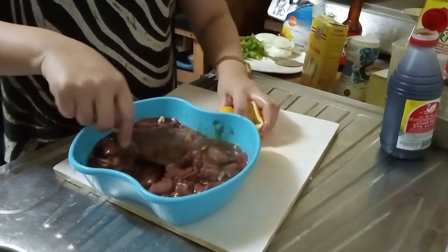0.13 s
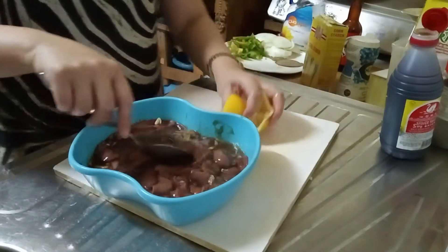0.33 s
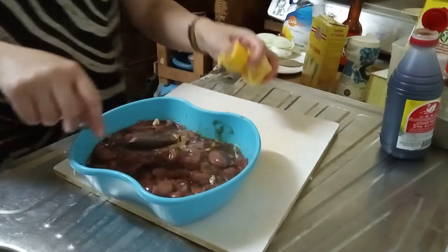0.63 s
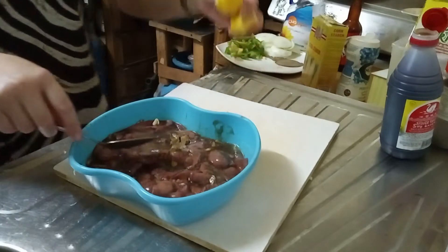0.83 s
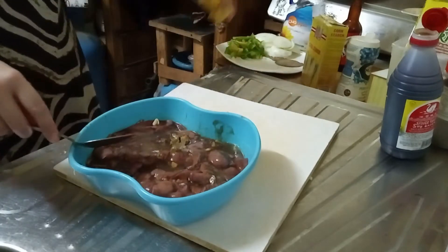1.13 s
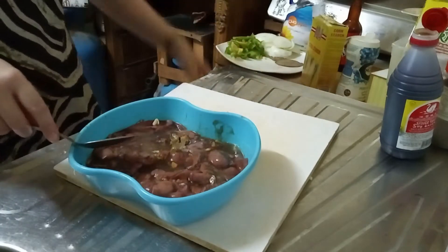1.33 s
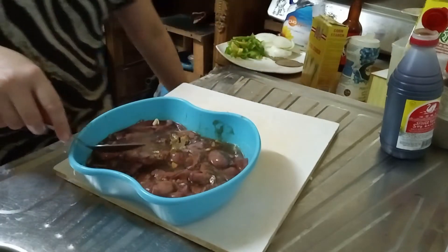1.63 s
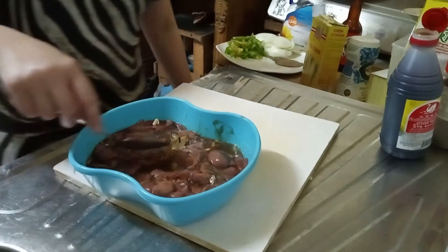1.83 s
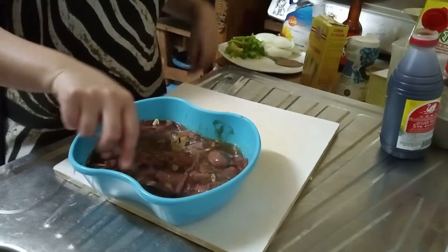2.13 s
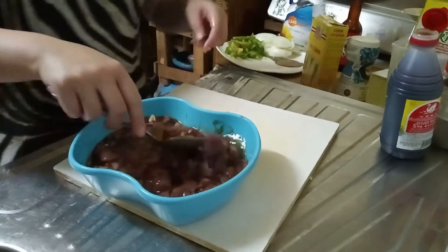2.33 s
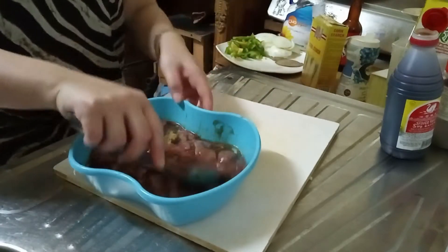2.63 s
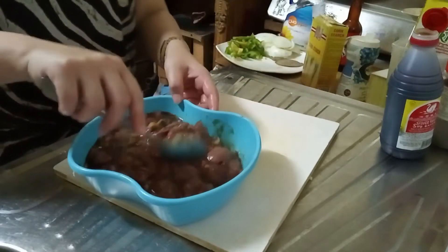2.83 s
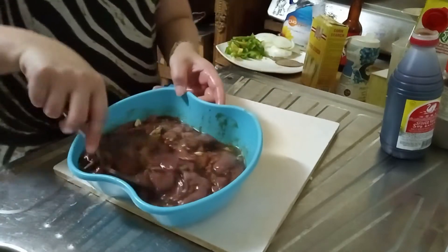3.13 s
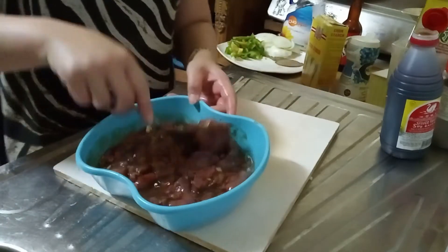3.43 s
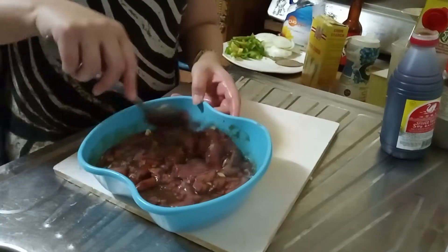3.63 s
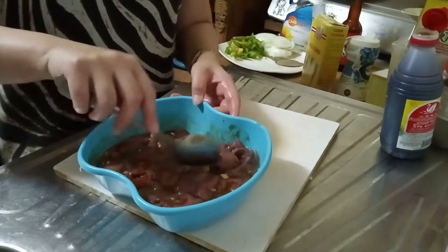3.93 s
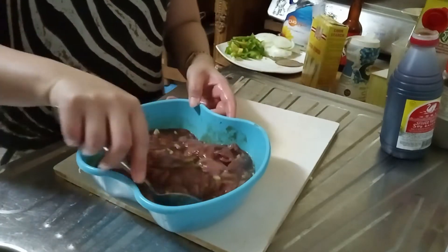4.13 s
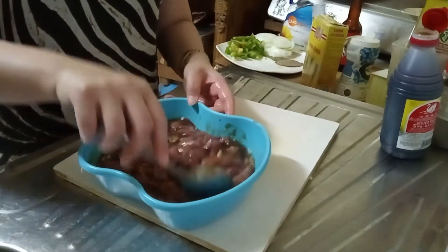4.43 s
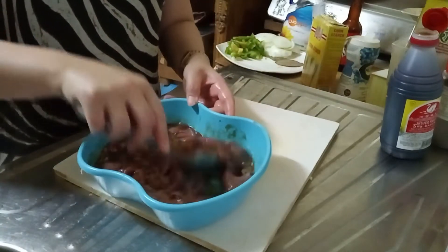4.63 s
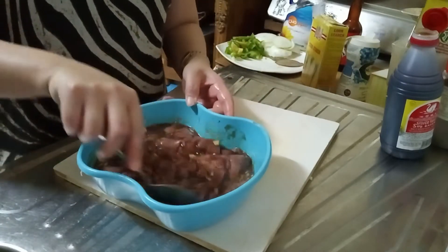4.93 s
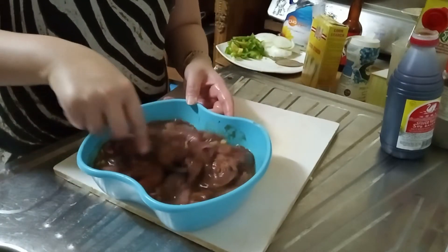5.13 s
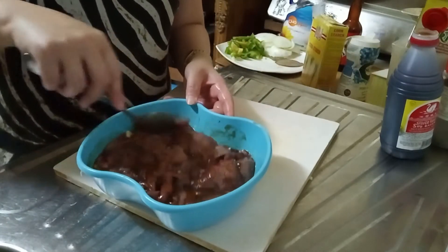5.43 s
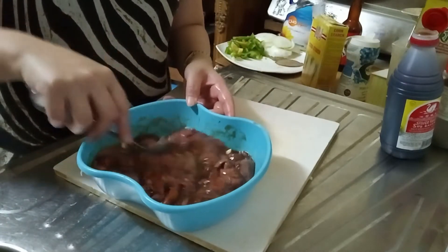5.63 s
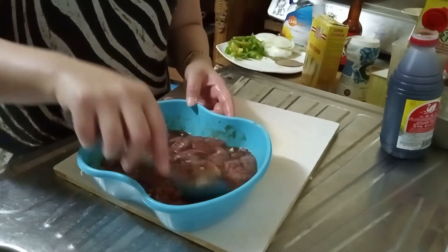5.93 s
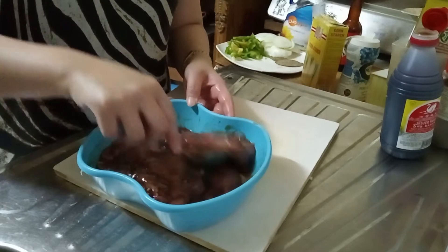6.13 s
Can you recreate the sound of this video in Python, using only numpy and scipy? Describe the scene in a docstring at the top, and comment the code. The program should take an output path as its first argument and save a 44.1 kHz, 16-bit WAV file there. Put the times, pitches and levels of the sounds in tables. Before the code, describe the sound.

A metal spoon stirs raw meat in marinade, ticking and scraping irregularly against a plastic bowl. The bowl rings briefly and thumps on a cutting board. About two seconds in, one longer stroke swishes through the meat. Faint squelches and tiny bubble pops fill the gaps, and the loudest knocks come near the end. It sounds close, in a small kitchen with a short echo and a low hum.

```python
"""Over a low hum, a metal spoon scrapes and ticks on a plastic bowl, stirring raw meat in marinade.
Each touch makes the bowl ring, and the heavy bowl thumps on its cutting board. About two seconds in,
one long stroke swishes through the meat. Between strokes the marinade squelches faintly and tiny
bubbles pop. The close walls of a small kitchen add a short echo."""
import sys
import numpy as np
from scipy import signal
from scipy.io import wavfile

SR = 44100
rng = np.random.default_rng(int(sys.argv[2]) if len(sys.argv) > 2 else 0)


def bounce(signal):
    """Save signal as a 16-bit WAV file at the path given by the first command-line argument."""
    frames = np.transpose(np.atleast_2d(signal))
    limited = np.clip(frames, -1, 1)
    pcm = np.round(limited * 32767).astype(np.int16)
    wavfile.write(sys.argv[1], SR, pcm)


N = 277256

# Levels in the tables are relative: the functions add their own gains. fade_s is the time to fall 60 dB.
# Tone of the room's background noise: freq_hz, level_db
HUM_TONE = [(20, -29.5), (45, -24.5), (70, -6), (100, 5.5), (125, 7.5), (160, -1), (220, -9), (300, -20.5),
            (600, -21.5), (1000, -36.5), (2500, -42), (6000, -49), (8500, -58), (15500, -56)]
# How the low drone rises and falls: time_s, level_db
DRONE_LEVELS = [(0, -61.5), (.5, -63), (.78, -69.5), (.95, -62.5), (1.5, -68.5), (1.78, -66.5), (1.95, -60),
                (2.45, -65.5), (2.65, -60), (2.95, -63.5), (3.8, -63.5), (4.1, -67.5), (4.5, -63),
                (4.85, -62), (5.08, -74), (5.38, -65.5), (6.1, -61), (6.28, -68.5)]
# Slow pushes of the spoon squeeze the meat: start_s, rise_s, hold_s, slosh_db, fizz_db
SQUEEZES = [(0.615, 0.048, .01, -68, -83), (0.853, 0.07, .04, -68.5, -80), (1.032, 0.075, .06, -74.5, -88),
            (1.432, .008, .01, -68.5, -79), (1.546, 0.047, .1, -79, -84.5), (1.656, 0.23, .08, -73, -70.5),
            (2.471, 0.12, .09, -66.5, -80), (2.738, 0.014, .04, -63, -70), (2.83, 0.044, .18, -80, -95),
            (3.446, 0.11, .01, -73, -80), (3.628, .003, .1, -76.5, -71), (3.771, 0.14, .03, -67, -75),
            (4.15, 0.019, .03, -84, -81.5), (4.223, 0.062, .02, -69, -76.5), (4.4, 0.025, .05, -85, -98.5),
            (5.184, 0.026, .03, -87, -84.5), (5.318, 0.038, 0.026, -63, -69.5),
            (5.539, 0.0031, .004, -77, -66), (5.58, .02, .07, -78, -92), (6.004, 0.045, .1, -80.5, -97.5),
            (6.135, .03, .04, -72, -87)]
# Tone of the low, wet part of a squelch: freq_hz, level_db
SLOSH_TONE = [(150, -1), (400, 4), (700, 0), (1100, -5.5), (1900, -9.5), (3000, -20), (6000, -32.5),
              (12000, -58)]
# Tone of the bright part of a squelch: freq_hz, level_db
FIZZ_TONE = [(800, -18.5), (2000, 7.5), (3000, 2), (4500, 3), (6300, 1), (8000, -21.5), (10000, -18),
             (14000, -34.5)]
# Notes the thin steel spoon sings as it slides: pitch_hz, level_db, fade_s
SPOON_NOTES = [(1907, 3.5, 0.16), (3170, -1, .1), (3780, 2.5, 0.2)]
# Short pings (bubbles, wet smacks and three light clinks of the spoon):
# start_s, level_db, pitch_hz, fade_s
PINGS = [(0.085, -27.5, 494, 0.08), (0.115, -54.5, 6700, .008), (0.319, -47.5, 2910, 0.014),
         (0.3194, -47, 1900, .035), (2.271, -66, 9900, .008), (2.318, -64.5, 9900, .009),
         (2.4434, -48.5, 2280, 0.012), (2.4883, -59.5, 3200, 0.021), (2.5122, -51, 2424, 0.0075),
         (2.513, -66, 7200, 0.0046), (2.519, -71, 9900, .005), (2.5646, -48.5, 1200, 0.023),
         (2.7517, -49, 1530, 0.0065), (2.752, -51.5, 5700, .006), (2.9118, -51, 4000, 0.0019),
         (3.185, -62.5, 9200, 0.0076), (3.552, -65, 9600, 0.0065), (3.63, -59.5, 6640, 0.0045),
         (4.2936, -51.5, 2460, 0.018), (4.578, -73, 10600, .03), (4.698, -64, 9950, .003),
         (5.203, -62.5, 1960, 0.054), (5.314, -60.5, 1040, 0.056), (5.3375, -46.5, 1745, .055),
         (5.549, -61.5, 8960, 0.0036), (5.549, -49, 1490, 0.019)]
# Scrapes on the bowl wall and, at 0.41 s, a faint, bright fizz of the marinade:
# start_s, rise_s, hold_s, level_db, pitch_hz, width_octaves
SCRAPES_AND_FIZZ = [(0.014, 0.089, 0.033, -55, 3460, 1.35), (.081, 0.0086, .01, -36.5, 520, 0.41),
                    (0.087, .002, 0.037, -41, 1490, 0.6), (0.123, 0.017, 0.027, -41.5, 1830, 1.37),
                    (0.41, 0.023, 0.035, -66, 4020, 0.78), (1.177, .002, .02, -48, 560, 0.76),
                    (1.18, .004, 0.021, -51.5, 1640, .74), (1.432, 0.0018, 0.012, -59, 580, 0.44),
                    (1.872, .006, 0.022, -56.5, 2000, 3.6), (2.074, 0.0082, 0.05, -46, 655, 0.95),
                    (2.199, 0.0029, 0.11, -49, 417, .94), (2.259, .003, 0.058, -40, 1200, 1.53),
                    (2.563, 0.0033, .026, -63, 1220, 0.45), (3.144, .001, 0.0065, -50, 4260, 1.2),
                    (3.15, 0.0015, 0.0057, -49.5, 527, 0.25), (3.167, 0.0055, 0.015, -49, 3200, 1.03),
                    (4.244, 0.0044, 0.013, -64, 2460, 0.57), (4.574, .003, .013, -45, 1100, 3.9),
                    (4.662, 0.0033, 0.03, -38.5, 1030, 1.2), (5.366, .004, 0.013, -53.5, 554, 0.52),
                    (5.675, 0.02, 0.0035, -60, 2230, 1.2), (5.696, 0.004, 0.0072, -32.5, 1480, .7),
                    (5.702, 0.0053, 0.031, -27.5, 940, 0.97), (5.703, 0.0091, 0.046, -40, 3150, 0.84),
                    (5.736, 0.012, 0.013, -33, 950, 0.8)]
# Tone of a spoon touching plastic: freq_hz, level_db
TOUCH_TONE = [(30, -31), (60, -22), (200, -4.5), (400, 10), (1400, 4), (2700, 1.5), (3600, -5),
              (6000, -8.5), (7000, -16), (8200, -28), (10000, -27.5), (12500, -44), (16000, -30)]
# Notes the bowl rings at with the spoon in it: pitch_hz, level_db, fade_s
BOWL_NOTES = [(371, 5.5, 0.14), (530, -7.5, 0.19), (639, -7, 0.24), (664.6, 1.5, 0.18), (813, -2, 0.034),
              (851, -2, 0.12), (872, -1.5, 0.086), (1166, -17, 0.12), (1172, -8, .14), (1440, 0.5, 0.13),
              (1576, -7.5, 0.062), (1900, -5, 0.04), (2026, -6, 0.21), (2223, -12.5, 0.17),
              (2610, -6, 0.11), (4550, -11, 0.11)]
# The spoon hits the bowl: start_s, level_db, pitch_hz, width_octaves, ring_db
SPOON_HITS = [(0.0864, -30.5, 1450, .7, -15), (0.093, -34, 372, 0.23, -6), (0.1756, -36.5, 1800, 1.8, 16.5),
              (0.3189, -46.5, 2400, 0.27, -11), (1.174, -27.5, 1906, 0.61, -15),
              (2.213, -32.5, 544, 0.36, -13), (2.2607, -31, 1500, 0.28, -19),
              (2.312, -25.5, 2180, 0.2, -29), (2.3193, -28, 2390, 0.37, -14),
              (3.1466, -31.5, 3030, 0.23, -16), (3.1676, -30.5, 1840, .55, -24.5),
              (4.5777, -42, 2940, 0.78, -19), (4.579, -32, 2070, 0.36, -22),
              (4.6668, -29.5, 2040, 0.37, -10), (4.6693, -27.5, 1870, 0.62, 8.5),
              (4.684, -24.5, 1100, 0.67, -3.5), (4.699, -29, 3160, 1.4, -3.5),
              (5.551, -55.5, 4000, 0.87, -10), (5.7037, -24, 1460, 0.36, 10),
              (5.712, -17.5, 1244, 0.51, 4.5), (5.714, -24, 644, 0.18, 3)]
# Bowl and board bump on the counter: start_s, level_db, pitch_hz, hold_s
BOWL_BUMPS = [(.098, -31, 185.7, 0.022), (.1, -48.5, 108, 0.096), (.148, -41, 171, 0.022),
              (0.637, -51, 129, 0.025), (1.175, -41, 154.3, 0.035), (1.216, -40, 120.6, 0.023),
              (2.095, -46.5, 115.5, 0.086), (2.208, -40, 136, 0.026), (2.23, -42.5, 188.7, 0.028),
              (2.32, -53, 186.4, 0.026), (3.159, -39, 183.9, 0.023), (4.203, -50.5, 148.6, 0.038),
              (4.587, -35, 135.5, 0.014), (4.593, -42, 92.5, 0.042), (4.688, -40.5, 175, 0.023),
              (4.813, -44, 110.7, 0.0055), (5.697, -31.5, 181.9, 0.041), (5.707, -37.5, 121, 0.035),
              (6.065, -50, 117.4, 0.012)]
# How the long stroke through the meat swells and fades: time_s, level_db
STROKE_LEVELS = [(1.7, -94), (1.855, -70.5), (1.879, -49.5), (1.97, -41.5), (2.06, -45.5), (2.111, -43),
                 (2.23, -55), (2.34, -52), (2.42, -72)]
# Tone of that stroke: freq_hz, level_db
SWISH_TONE = [(40, -21), (100, 6.5), (250, -12), (400, -2), (600, -3), (900, 0), (1400, 0), (2500, -3),
              (4000, -7), (6200, -11), (7200, -20.5), (8200, -30.5), (10000, -31), (12500, -49),
              (15500, -48.5)]
# How long the kitchen echoes, from low to high: freq_hz, fade_s
ECHO_FADES = [(120, 0.3), (500, 0.27), (1500, 0.26), (5000, 0.24), (10000, 0.24)]

FREQS_HZ = np.fft.rfftfreq(4096, 1 / SR)  # the frequencies at which tones are shaped


def gain_of(db):
    """Turns decibels into a number to multiply a sound by."""
    return 10 ** (np.asarray(db) / 20)


def unit_level(x):
    """Scales a sound to an average (rms) level of 1."""
    return x / np.sqrt(np.mean(x ** 2) + 1e-20)


def look_up(table, hz):
    """Reads between a table's rows, with frequency spaced in octaves."""
    freqs, values = np.transpose(table)
    return np.interp(np.log(hz + 1), np.log(freqs), values)


def add(mix, start_s, sound):
    """Mixes a sound in at its start time."""
    part = mix[round(start_s * SR):][:len(sound)]
    part += sound[:len(part)]


def sharp_click(tone_db):
    """The most sudden click that has this tone (a minimum-phase filter)."""
    log_gain = np.log(gain_of(np.maximum(tone_db, tone_db.max() - 90)))
    mirrored = np.concatenate([log_gain, log_gain[-2:0:-1]])
    spectrum = np.exp(np.conj(signal.hilbert(mirrored)))
    return np.fft.ifft(spectrum).real[:len(FREQS_HZ)]


def with_tone(x, tone):
    """Filters a long sound to have this tone, at an average level of 1."""
    return unit_level(signal.oaconvolve(x, sharp_click(look_up(tone, FREQS_HZ)))[:N])


def crackle(length, per_s, spread_db):
    """Tiny clicks at random times, a few of them large."""
    size = gain_of(spread_db * np.minimum(rng.exponential(1, length), 4))
    return unit_level(size * rng.choice([-1, 1], length) * (rng.random(length) < per_s / SR))


def push(t, rise_s, hold_s, fade_s):
    """A force that builds, holds and lets go."""
    build = np.minimum(t / max(rise_s, 1e-3), 1)
    return build * gain_of(-60 * np.maximum(t - rise_s - hold_s, 0) / fade_s)


def ringing(notes, detune=0.003):
    """An object rings with its own fading notes; the shifting meat moves their pitch a little."""
    t = np.arange(SR // 4) / SR
    ring = np.zeros(len(t))
    for hz, db, fade_s in notes:
        shifted_hz = hz * (1 + detune * rng.standard_normal())
        ring += gain_of(db - 60 * t / fade_s) * np.sin(2 * np.pi * shifted_hz * t)
    return ring / np.linalg.norm(ring)


def hum(drone_db=1.0, air_db=-60, waver_db=2.8, split_hz=280):
    """A low drone wavers at random, under the steady air of the room."""
    t = np.arange(N) / SR
    waves = [np.sin(2 * np.pi * (hz * t + rng.random())) for hz in np.geomspace(4, 10, num=16)]
    level_db = drone_db + np.interp(t, *np.transpose(DRONE_LEVELS)) + waver_db * unit_level(sum(waves))
    noise = with_tone(rng.standard_normal(N), HUM_TONE)
    low = signal.sosfiltfilt(signal.butter(2, split_hz, fs=SR, output="sos"), noise)
    return gain_of(air_db) * (noise - low) + gain_of(level_db) * unit_level(low)


def bubbles(per_s=500, fade_cycles=8, spread_db=1.5, low_hz=1100, high_hz=4200):
    """Tiny bubbles burst, each ringing briefly at a pitch set by its size."""
    out, t = np.zeros(N), np.arange(SR // 25) / SR
    pitches = np.geomspace(low_hz, high_hz, num=24)
    for hz in pitches:
        ring = np.sin(2 * np.pi * hz * t) * np.exp(-t * hz / fade_cycles) * (1 - np.exp(-t * hz))
        out += signal.oaconvolve(crackle(N, per_s / len(pitches), spread_db), ring)[:N]
    return unit_level(out)


def marinade(slosh_db=-3, fizz_db=-3, bubble_db=-12, spoon_db=-17):
    """Bubbly squelching swells with each push, then the meat settles; the spoon rings along."""
    t = np.arange(SR) / SR
    # The marinade is never quite still, so both levels start just above silence.
    slosh_level, fizz_level = np.full(N, gain_of(-82.5)), np.full(N, gain_of(-99))
    for start_s, rise_s, hold_s, wet_db, bright_db in SQUEEZES:
        squeeze = push(t, rise_s, hold_s, fade_s=0.19)
        add(slosh_level, start_s, gain_of(wet_db) * squeeze)
        add(fizz_level, start_s, gain_of(bright_db) * squeeze)
    slosh = with_tone(crackle(N, per_s=2200, spread_db=2.0), SLOSH_TONE)
    fizz = with_tone(crackle(N, per_s=2000, spread_db=0.6), FIZZ_TONE)
    out = gain_of(slosh_db) * slosh_level * slosh + gain_of(fizz_db) * fizz_level * fizz
    out += gain_of(bubble_db) * np.maximum(slosh_level, fizz_level) * bubbles()
    return out + gain_of(spoon_db) * signal.fftconvolve(out, ringing(SPOON_NOTES))[:N]


def pitched_click(hz, octaves, max_cut_db=32):
    """A click with the tone of spoon on plastic, where a harder spot gives a higher pitch."""
    distance = np.log2((FREQS_HZ + 1) / hz) / octaves
    cut_db = max_cut_db * np.tanh(3.57 * distance ** 2 / max_cut_db)  # quieter away from the pitch
    return sharp_click(look_up(TOUCH_TONE, FREQS_HZ) - cut_db)


def scrapes_and_fizz(ring_db=-15, gain_db=-2):
    """Dense clicks ring the bowl: tiny slips of the spoon's edge, and once a faint fizz of marinade."""
    out, t = np.zeros(N), np.arange(SR // 4) / SR
    for start_s, rise_s, hold_s, db, hz, octaves in SCRAPES_AND_FIZZ:
        clicks = crackle(len(t), per_s=3000, spread_db=3.5)
        rasp = unit_level(signal.fftconvolve(clicks, pitched_click(hz, octaves))[:len(t)])
        burst = gain_of(db + gain_db) * rasp * push(t, rise_s, hold_s, fade_s=0.13)
        add(out, start_s, burst)
        add(out, start_s, gain_of(ring_db) * signal.fftconvolve(burst, ringing(BOWL_NOTES)))
    return out


def pings():
    """Bubbles, wet smacks and three light clinks of the spoon, each one quickly fading note."""
    out, t = np.zeros(N), np.arange(SR // 10) / SR
    for start_s, db, hz, fade_s in PINGS:
        level = gain_of(db - 60 * t / fade_s) * (1 - np.exp(-t * hz))
        add(out, start_s, level * np.sin(2 * np.pi * hz * t))
    return out


def knocks(bowl_db=-15, tick_db=-1, chatter_db=-3, chatter_fade_s=0.071):
    """The spoon ticks on the plastic wall, chatters against it briefly and leaves the bowl ringing."""
    out, t = np.zeros(N), np.arange(SR // 25) / SR
    for start_s, db, hz, octaves, ring_db in SPOON_HITS:
        touch = pitched_click(hz, octaves)
        tick = gain_of(db) * touch / abs(touch).max()
        bounces = rng.standard_normal(len(t)) * gain_of(-60 * t / chatter_fade_s)
        chatter = signal.fftconvolve(tick, bounces)
        chatter *= np.linalg.norm(tick) / np.linalg.norm(chatter)
        add(out, start_s, gain_of(tick_db) * tick)
        add(out, start_s, gain_of(chatter_db) * chatter)
        add(out, start_s, gain_of(ring_db + bowl_db) * signal.fftconvolve(tick, ringing(BOWL_NOTES)))
    return out


def thumps(overtone_db=-15, overtone_ratio=2.05, rattle_gain=0.27, counter_hz=88, counter_db=-17):
    """The full bowl rocks the board with a short, uneven boom; the counter adds a lower note."""
    out, t = np.zeros(N), np.arange(SR // 4) / SR
    for start_s, db, hz, hold_s in BOWL_BUMPS:
        near_pitch = signal.butter(2, [hz / 2, hz * 2], "band", fs=SR, output="sos")
        rattle = unit_level(signal.sosfilt(near_pitch, rng.standard_normal(len(t))))
        boom = np.sin(2 * np.pi * hz * t) + rattle_gain * rattle
        boom += gain_of(overtone_db) * np.sin(2 * np.pi * hz * overtone_ratio * t)
        boom += gain_of(counter_db) * np.sin(2 * np.pi * counter_hz * t)
        add(out, start_s, gain_of(db) * boom * push(t, rise_s=0.01, hold_s=hold_s, fade_s=0.14))
    return out


def swish(gain_db=-2):
    """Wet meat slides along spoon and bowl with a fine, dense fizz."""
    stroke_db = np.interp(np.arange(N) / SR, *np.transpose(STROKE_LEVELS), left=-140, right=-140)
    return gain_of(gain_db + stroke_db) * with_tone(crackle(N, per_s=10000, spread_db=2.5), SWISH_TONE)


def kitchen_echo(x, first_s=0.0041, build_s=0.0055):
    """Sound bounces off close walls; the echoes build up and die within a third of a second."""
    t = np.arange(SR // 2) / SR
    echoes = rng.choice([-1, 1], len(t)) * (rng.random(len(t)) < 4000 / SR)  # about 4000 a second
    build = np.clip((t - first_s) / build_s, 0, 1)
    hz, age_s, bands = signal.stft(echoes * build, SR, nperseg=256)
    fade = gain_of(-60 * age_s / look_up(ECHO_FADES, hz)[:, None])
    tail = signal.istft(bands * fade, SR, nperseg=256)[1]
    return signal.fftconvolve(x, tail / np.linalg.norm(tail))[:N]


def scene():
    """Spoon, bowl and marinade with their echo, over the room's low hum."""
    ticks = knocks()
    rasps = scrapes_and_fizz() + swish()
    booms = thumps()
    soft = marinade() + pings()
    to_walls = gain_of(-8) * ticks + gain_of(-9) * rasps + gain_of(-10.5) * soft + gain_of(-12.5) * booms
    return (ticks + rasps + soft + booms + kitchen_echo(to_walls) + hum())[None]


def record(dry):
    """Cuts the very highest treble, above 15500 Hz."""
    treble_cut = signal.firwin(511, 15500, window=("kaiser", 9), fs=SR)
    return signal.oaconvolve(dry, treble_cut[None], "same")


dry = scene()
out = record(dry)
bounce(out)
```